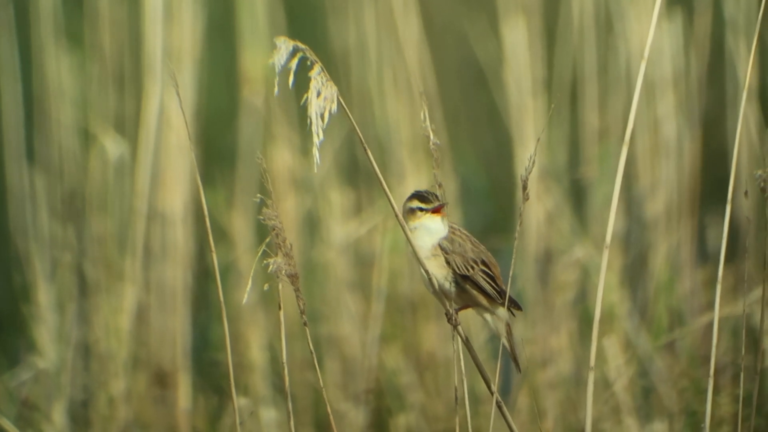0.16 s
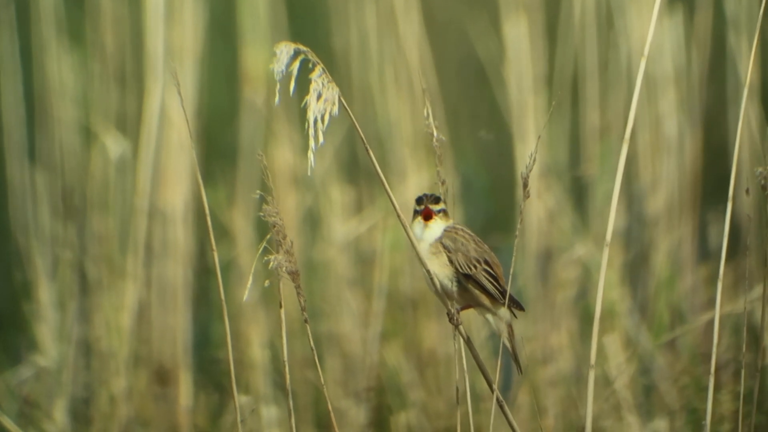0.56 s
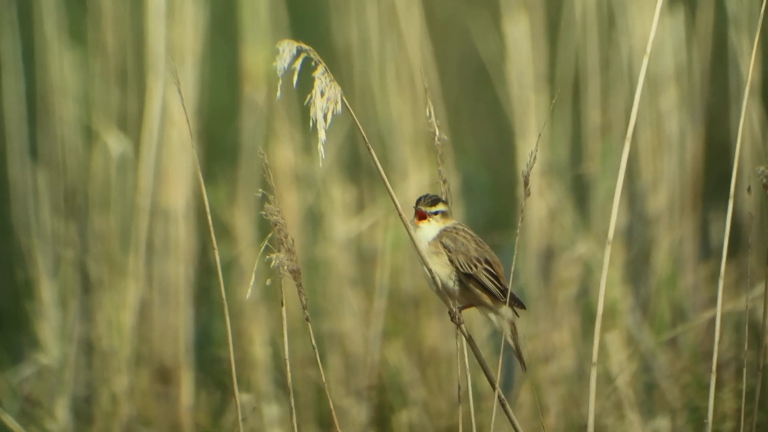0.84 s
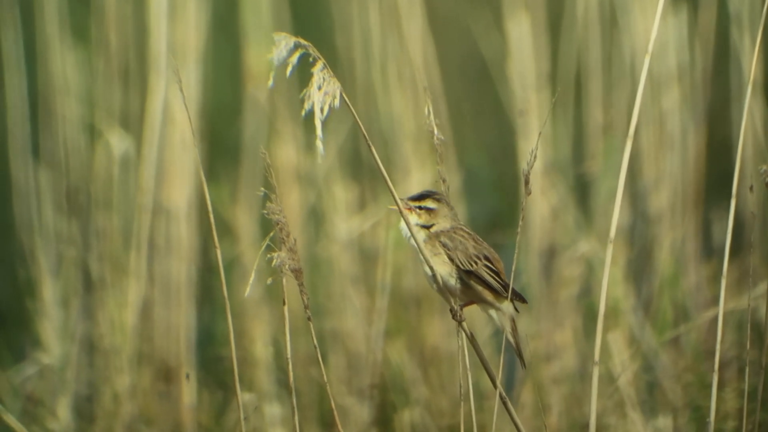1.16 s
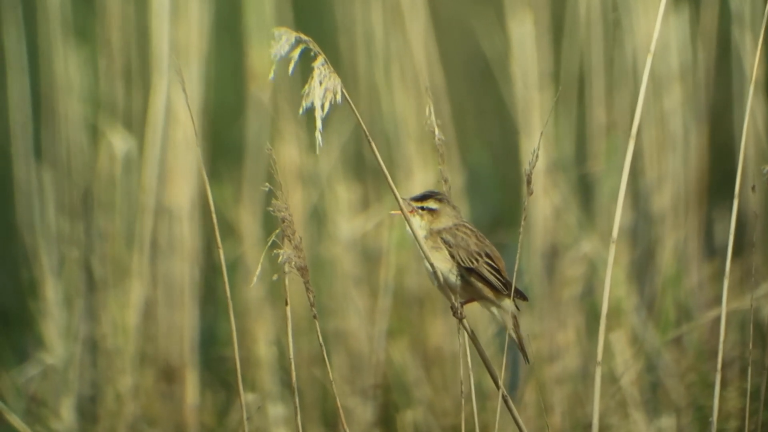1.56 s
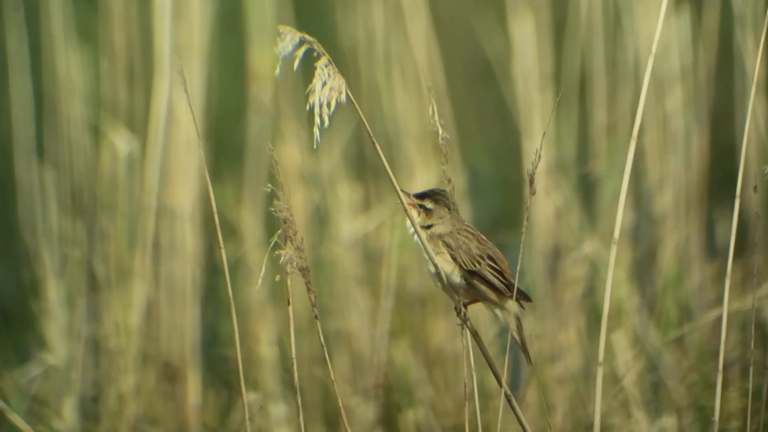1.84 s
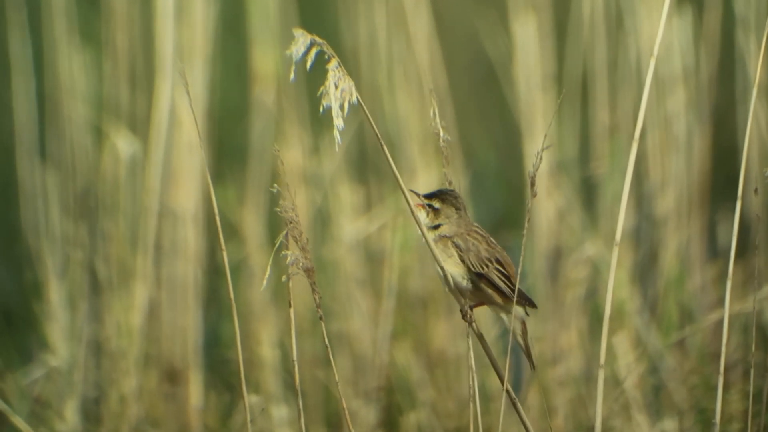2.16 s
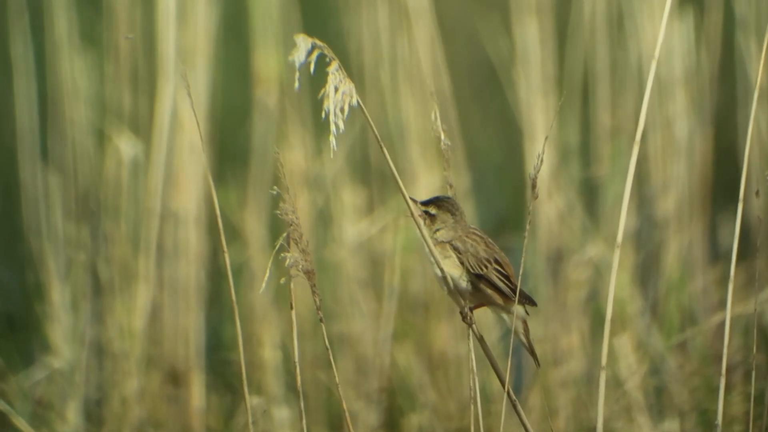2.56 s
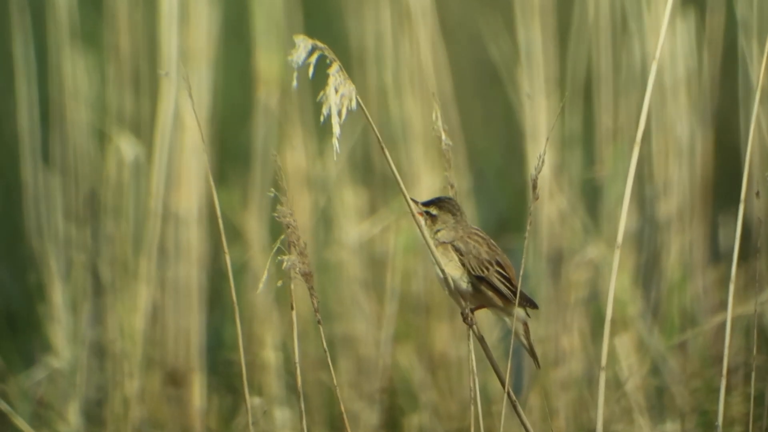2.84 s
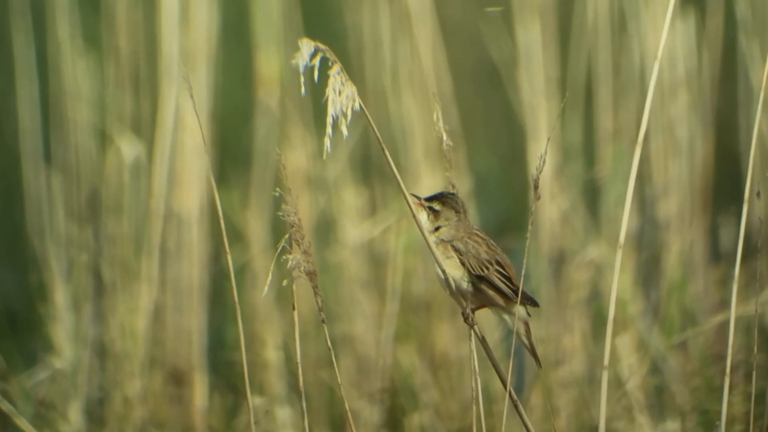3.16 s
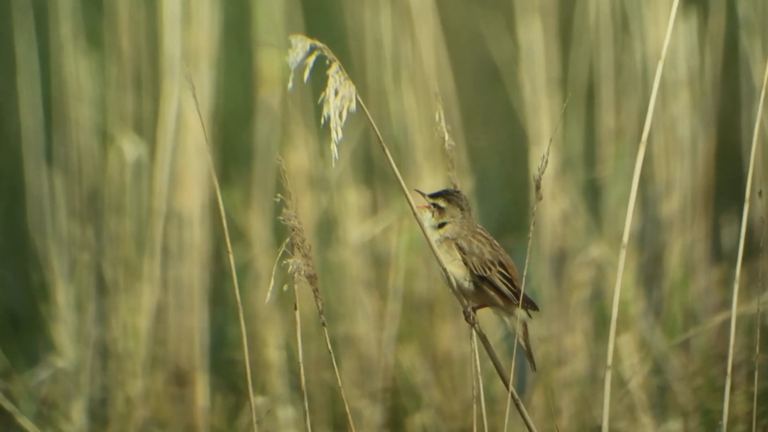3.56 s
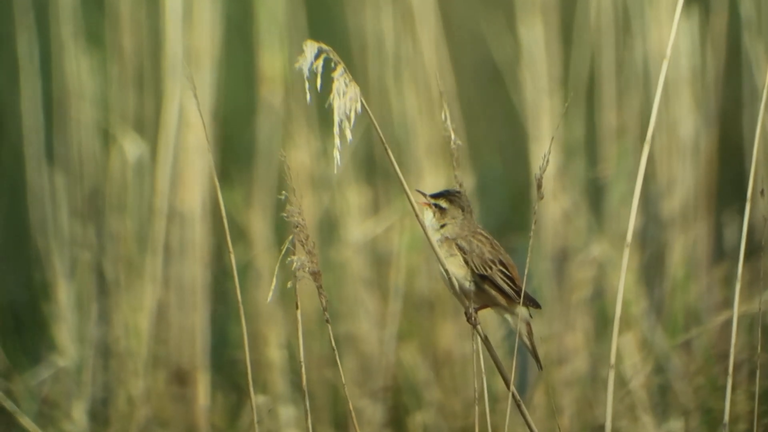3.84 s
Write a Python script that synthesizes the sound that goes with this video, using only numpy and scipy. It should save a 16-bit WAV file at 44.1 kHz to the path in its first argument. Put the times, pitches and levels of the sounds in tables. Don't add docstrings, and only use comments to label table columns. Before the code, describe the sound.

A small warbler close by chatters rapidly, alternating raspy paired chits and buzzy four-beat churrs with thin whistles; another bird churrs behind, reeds hiss faintly, and wind bumps the microphone in the second half.

```python
import sys
import numpy as np
from scipy import signal
from scipy.fft import rfft, irfft, next_fast_len
from scipy.io import wavfile
from scipy.ndimage import uniform_filter1d, map_coordinates

SR = 44100
rng = np.random.default_rng(int(sys.argv[2]) if len(sys.argv) > 2 else 0)


def generate_wav(signal):
    frames = np.transpose(np.atleast_2d(signal))
    scaled = np.clip(frames, -1, 1) * 32767
    pcm = np.round(scaled).astype(np.int16)
    wavfile.write(sys.argv[1], SR, pcm)


def amplitude_ratio(level_db):
    exponent = np.asarray(level_db, float) / 20
    return 10 ** exponent


N = 176400
T = np.arange(N) / SR


def unit(x):
    return x / np.sqrt(np.mean(x ** 2) + 1e-20)


def along(points, hz):
    f, v = np.transpose(points)
    return np.interp(np.log(hz + 1), np.log(f + 1), v)


def wobble(rate_hz):
    knots = rng.standard_normal(int(N * rate_hz / SR) + 4)
    return map_coordinates(knots, [T * rate_hz])


def tone(hz):
    return np.sin(2 * np.pi * np.cumsum(hz) / SR)


def filtered(x, response):
    m = next_fast_len(N + SR // 2)
    return irfft(rfft(x, m) * response(np.fft.rfftfreq(m, 1 / SR)), m)[..., :N]


def beats(rows):
    rows = np.array(sorted(rows))
    nearest = np.searchsorted((rows[1:, 0] + rows[:-1, 0]) / 2, T)
    u = np.clip(2 * (T - rows[nearest, 0]) / rows[nearest, 1], -1, 1)
    env = amplitude_ratio(rows[nearest, 2]) * np.cos(np.pi * u / 2) ** 2 * (abs(u) < 1)
    return env, u, rows[nearest, 3:].T


def placed(x, lead_rad, pan_db):
    ports = filtered(x, lambda f: np.exp(.5j * lead_rad(f) * np.array([[1], [-1]])))
    return amplitude_ratio([[pan_db / 2], [-pan_db / 2]]) * ports


def facing():
    # time in seconds, level in dB.
    turn_of_head = [
        (0, 0.5),
        (1.05, -6.5),
        (1.2, -18.5),
        (4, -19.5),
    ]
    return np.interp(T, *np.transpose(turn_of_head))


def air():
    # frequency in Hz, level in dB.
    air_curve = [(8000, -120), (9000, -44), (11500, -43), (13300, -31), (14200, -31), (14900, -70)]
    hiss = filtered(rng.standard_normal(N), lambda f: amplitude_ratio(along(air_curve, f)))
    return unit(hiss) * amplitude_ratio(facing())


def churr(rows):
    # multiple of the pitch, level in dB.
    partials = [(1.5, -23), (2, 0), (2.62, -12), (3, -3), (3.5, -22), (4, -21)]
    trims_db = [-0.5, -0.83, -7, 0.5, -8.2, -1.5]
    sag, waver = .06, .015
    upper_ratio, upper_sag, upper_waver = 3.05, .26, .015
    second_db, breath_db, air_db = -6, -10, -44.5
    top_facing, beat_lean = 0.35, 0.13

    env, u, (hz, upper_db, top_db) = beats(rows)
    turn = 2 * np.pi * np.cumsum(hz * (1 - sag * u / 2 + waver * wobble(300))) / SR
    stack = 0
    for (k, db), trim_db in zip(partials, trims_db):
        level_db = db + trim_db + 2 * wobble(150)
        if 2.2 < k < 3.7:
            level_db = level_db + upper_db
        if k > 3.7:
            level_db = level_db + top_db + top_facing * facing()
        stack = stack + amplitude_ratio(level_db) * np.sin(k * turn + k * k)

    second = tone(upper_ratio * hz * (1 - upper_sag * u / 2 + upper_waver * wobble(170)))
    breath_band = lambda f: np.exp(-((f - 4500) / 900) ** 2) * (f > 3800)
    breath = unit(filtered(rng.standard_normal(N), breath_band))
    upper = amplitude_ratio(upper_db) * (amplitude_ratio(second_db) * second + amplitude_ratio(breath_db) * breath)
    crest = 0.53 + 0.83 * np.exp(-(2.76 * u) ** 2) - 0.48 * np.clip(u, 0, 1)
    return env * (1 + beat_lean * u) * crest * (stack + upper + amplitude_ratio(air_db) * air())


def singer_churrs():
    # first beat in seconds, pitch in Hz.
    churr_pitches = [(.207, 1516), (.388, 1508), (1.114, 1560), (1.280, 1522), (1.953, 1559), (2.103, 1606),
                     (2.288, 1524), (3.016, 1524), (3.183, 1529), (3.356, 1548), (3.528, 1538),
                     (3.704, 1505), (3.866, 1520)]
    # centre in seconds, level in dB, upper voice in dB; four to a churr.
    churr_beats = [(0.206, -45, 2), (0.229, -43, -1.7), (0.255, -44.5, 0), (0.285, -45.0, 0.5),
                   (0.389, -49, 2), (0.41, -44.5, -1.5), (0.436, -43, -3), (0.464, -45, -1),
                   (1.115, -51.5, 5), (1.136, -47.0, 5.4), (1.162, -47, 4.5), (1.191, -45, 1),
                   (1.279, -52, 7), (1.301, -45, -2.7), (1.327, -50, 0.5), (1.355, -48, 5.5),
                   (1.953, -52.5, 6), (1.973, -46.5, 2.5), (2.0, -47.5, 5), (2.027, -48, 3.6),
                   (2.103, -49, 1), (2.124, -49, 3), (2.151, -48, -1), (2.178, -47, 4), (2.288, -52.5, 6.0),
                   (2.31, -48.5, 1.5), (2.337, -51.5, 9.5), (2.366, -45.5, 4.5), (3.018, -48.5, 12.5),
                   (3.037, -42.5, 7), (3.066, -46.5, 6.5), (3.093, -47.5, 8), (3.184, -52, 13),
                   (3.204, -46.5, 8.5), (3.23, -47.5, 5), (3.259, -49, 6.5), (3.356, -49.5, 6),
                   (3.378, -44, 5.5), (3.405, -48.5, 8), (3.435, -47, 6), (3.528, -52, 11.5),
                   (3.55, -45, 4.5), (3.576, -46.5, 5.5), (3.606, -46.5, 4), (3.704, -51, 7.5),
                   (3.726, -47, 8.5), (3.751, -46.0, 5.5), (3.781, -54.5, 8.5), (3.867, -51.5, 9),
                   (3.888, -43.5, -0.5), (3.912, -47.5, 5.5), (3.943, -49, 5.5)]
    lengths_s = [.024, .026, .027, .028]
    top_db = [11.5, -0.5, -4, 2]
    rows = []
    for i, (s, db, upper_db) in enumerate(churr_beats):
        hz = churr_pitches[i // 4][1]
        rows.append((s, lengths_s[i % 4], db, hz, upper_db, top_db[i % 4]))
    return churr(rows)


def chits():
    # first beat in seconds, gap to second in seconds, first level in dB, second level in dB.
    chit_pairs = [(0.024, .020, -45.5, -41), (0.111, 0.022, -49, -44.5), (0.585, 0.019, -50.5, -44),
                  (0.662, 0.021, -48, -42), (.747, 0.021, -46, -41.5), (0.834, 0.02, -45.5, -42),
                  (.922, 0.02, -45, -43), (1.008, 0.022, -44.5, -48), (1.487, 0.02, -46.5, -44),
                  (1.562, 0.024, -48.5, -44), (1.652, 0.017, -45.5, -45), (1.732, 0.021, -48, -47.5),
                  (1.829, 0.018, -50.5, -44), (2.47, 0.021, -45, -43), (2.558, 0.015, -44, -42.5),
                  (2.647, 0.022, -47, -42.5), (2.73, 0.019, -44, -44), (2.827, 0.021, -44, -42),
                  (2.913, 0.019, -43, -42)]
    # frequency in Hz, level in dB.
    throat = [(1800, -59), (2250, -15.5), (3350, -16.5), (3900, -19), (4700, 3), (5900, -1.5), (6800, -6),
              (7500, -45.5)]
    lengths_s, pitch_hz, jitter = [0.016, 0.022], 1135.5, 0.01733
    noise_share, flutter_hz, air_db = 0.75, 428.6, -26.5

    rows = [(s + gap_s * k, lengths_s[k], dbs[k]) for s, gap_s, *dbs in chit_pairs for k in range(2)]
    env = beats(rows)[0]
    turn = 2 * np.pi * np.cumsum(pitch_hz * (1 + .02 * wobble(8) + jitter * wobble(500))) / SR
    stack = sum(amplitude_ratio(5.8 * wobble(120)) * np.sin(k * turn + k * k) for k in range(2, 8))
    stack = stack * (1 + 0.79 * tone(flutter_hz * (1 + 0.071 * wobble(100))))
    drive = np.sqrt(1 - noise_share) * unit(stack) + np.sqrt(noise_share) * rng.standard_normal(N)
    rasp = unit(filtered(drive, lambda f: amplitude_ratio(along(list(throat) + [(9000, -120)], f))))
    rasp = rasp / np.sqrt(.5 + abs(signal.hilbert(rasp)) ** 2 / 4)
    rasp = filtered(rasp, lambda f: 1 / (1 + (f / 7500) ** 30))
    return env * (rasp + amplitude_ratio(air_db) * air())


def whistles():
    # start in seconds, length in seconds, level in dB, pitch in Hz, rise as a share of pitch.
    thin_notes = [(.058, .048, -57, 4450, .04), (1.0, .088, -55, 5520, -.012),
                  (1.105, .018, -58, 5900, .05), (1.255, .02, -61, 4700, .03), (1.44, .02, -65, 5900, .09),
                  (1.45, .026, -63, 4650, .02), (1.945, .014, -62, 5850, 0), (2.808, .016, -63, 5300, .02),
                  (2.952, .04, -53, 5250, -.015), (2.978, .036, -56, 4300, .04),
                  (3.165, .018, -54, 4400, .03), (3.51, .014, -60, 4800, .05)]
    total = 0
    for k in range(2):
        env, u, (hz, rise) = beats([(s + d / 2, d, *rest) for s, d, *rest in thin_notes[k::2]])
        swell = (1 + 2 * u * u - u / 2) * amplitude_ratio(1 + 2 * wobble(150))
        total = total + env * swell * tone(hz * (1 + rise * u + .008 * wobble(100)))
    return total


def neighbour_churrs():
    # first beat in seconds, level in dB, pitch in Hz.
    far_churrs = [(.091, -52.5, 1560), (0.302, -68, 1560), (0.483, -68, 1560), (0.674, -64.5, 1560),
                  (0.864, -67.5, 1560), (1.033, -72.5, 1550), (1.219, -76, 1550), (1.423, -68.5, 1550),
                  (1.658, -66, 1570), (1.85, -63, 1570), (2.021, -59.5, 1560), (2.195, -58, 1580),
                  (2.37, -58, 1560), (2.55, -55, 1560), (2.854, -49, 1560), (2.999, -50, 1550),
                  (3.196, -49, 1560), (3.385, -50, 1550), (3.561, -50, 1550), (3.737, -50, 1550),
                  (3.906, -50.5, 1570)]
    offsets_s, length_s = [0, .022, 0.04155], 0.0321
    return churr([(s + b, length_s, db - 12 * (b == 0), hz, 1.5, -5)
                  for s, db, hz in far_churrs for b in offsets_s])


def echoes(x, t60_s):
    t = np.arange(SR // 2) / SR
    tail = rng.standard_normal((2, len(t))) * amplitude_ratio(-60 * t / t60_s) * (t > .002)
    return signal.fftconvolve(x[None], tail / np.linalg.norm(tail[0]), axes=1)[:, :N]


def birds():
    # frequency in Hz, phase lead between ports in radians.
    port_lead = [(2400, -.4), (4050, -.1), (4570, -1.2), (5200, -.6), (5600, .6), (6120, -1.2), (6400, -6),
                 (9000, -7.3)]
    song = singer_churrs() + chits() + whistles()
    far = neighbour_churrs()
    direct = placed(song, lambda f: along(port_lead, f), -1.5)
    direct = direct + placed(far, lambda f: along(port_lead, f) + 0.17, -8)
    echo = amplitude_ratio(-18.5) * echoes(song + far, t60_s=0.11)
    scatter = amplitude_ratio(-7) * echoes(song + far, t60_s=0.078)
    return direct + echo + scatter


def thumps():
    # time in seconds, level in dB, frequency in Hz, width in cycles.
    eddies = [(0.087, -54.5, 110, 0.5), (2.085, -38.5, 68.7, 0.32), (2.151, -49.5, 90, 0.61),
              (2.255, -28, 105.2, 0.59), (2.28, -47, 99, 1), (2.348, -43, 109, 0.9),
              (2.39, -40.5, 141.6, 0.7), (2.414, -30.5, 150, 0.42), (2.457, -22, 133.7, 0.45),
              (2.482, -27.5, 126, 1), (2.859, -46, 70, 0.48), (2.559, -46, 88, 0.16),
              (2.64, -37, 96.6, 0.86), (2.654, -32.5, 186, 0.25), (2.674, -37, 129, 0.54),
              (2.716, -38.5, 90.5, 0.44), (2.751, -30, 187, 0.49), (2.794, -46, 110, 0.7),
              (2.92, -51, 99, 0.85), (2.944, -31, 131, 0.37), (3.019, -42.5, 109.5, 0.31),
              (3.322, -42.5, 90, .5), (3.602, -27.5, 126, 0.94), (3.658, -32, 128.6, 0.37),
              (3.781, -51.5, 147, 0.83), (3.904, -32, 126, 0.46), (3.946, -33, 189.5, 0.47),
              (3.99, -43.5, 100.8, 0.66)]
    lead_rad, pan_db, wake_db, wake_s = -1.4, 2.1, -18.5, 0.03
    push, wake = np.zeros(N), np.zeros(N)
    for s, db, hz, wide in eddies:
        cycles = (T - s) * hz
        push += 1.91 * amplitude_ratio(db) * np.exp(-(cycles / wide) ** 2) * np.cos(2 * np.pi * cycles + .4)
        wake += amplitude_ratio(db) * np.exp(-abs(T - s) / wake_s)
    rumble_band = lambda f: (f / 110) ** 2 / (1 + (f / 140) ** 5)
    rumble = unit(filtered(rng.standard_normal((2, N)), rumble_band))
    push = filtered(push, lambda f: (f * f / (f * f + 40 ** 2)) ** 2)
    push = placed(push, lambda f: lead_rad * np.clip(f / 125, 0, 1.5), pan_db)
    return push + amplitude_ratio(wake_db + 5.44 * wobble(30)) * wake * rumble


def insect():
    # time in seconds, level in dB.
    tick_times = [(0.0217, -72), (0.0847, -80), (0.6434, -72), (0.7253, -74), (1.045, -74), (1.0879, -79),
                  (1.1653, -75), (1.2835, -72), (1.3209, -82), (1.3658, -80), (1.4411, -76), (1.8871, -72),
                  (1.924, -64), (2.0009, -73), (2.1231, -80), (2.2403, -81), (2.5506, -79), (2.604, -66),
                  (2.824, -77), (3.7275, -66.5), (3.8846, -72)]
    tick_hz, tick_s, tick_db = 7950, 0.018, 5
    env = beats([(s + tick_s / 3, tick_s, db + tick_db, 0) for s, db in tick_times])[0]
    return placed(env * tone(tick_hz * (1 + .012 * wobble(180))), lambda f: 2 + 0 * f, -3.5)


def reeds():
    # frequency in Hz, level in dB.
    reed_curve = [(15, -71), (35, -19.5), (150, -10), (500, -14), (1560, -21.5), (5500, -29.5),
                  (8100, -37.5), (8400, -44.5)]
    # frequency in Hz, likeness of the two sides from -1 to 1.
    likeness = [(60, 0.8), (120, .93), (240, 0.47), (500, 0.49), (1500, -0.46)]
    z = signal.stft(rng.standard_normal((2, N)), nperseg=512)[2]
    patches = uniform_filter1d(rng.standard_normal(z.shape[1:]), size=4, axis=0)
    patches = unit(uniform_filter1d(patches, size=14, axis=1))
    depth_db = np.linspace(1.5, 9, len(patches))[:, None]
    pair = signal.istft(z * amplitude_ratio(depth_db * patches), nperseg=512)[1][:, :N]

    def mid_side(hz):
        turn = np.arccos(np.clip(along(likeness, hz), -1, 1)) / 2
        level = amplitude_ratio(along(list(reed_curve) + [(15000, -64.5), (16000, -120)], hz))
        return level * [np.cos(turn), np.sin(turn)]

    mid, side = filtered(pair, mid_side)
    sway_db = .7 * wobble(2)
    return amplitude_ratio(-64.5 + sway_db) * amplitude_ratio([[-.6], [.6]]) * [mid + side, mid - side] / mid.std()


def masked(x):
    split_hz, top_hz, under_song_db = 6400, 8600, -37
    hz, _, z = signal.stft(x, SR, nperseg=1024)
    power = uniform_filter1d(abs(z) ** 2, size=16, axis=1)
    power = uniform_filter1d(power, size=3, axis=2).mean(0)
    song = power[(hz > 2500) & (hz < split_hz)].max(0)
    limit = song * amplitude_ratio(2 * under_song_db + 5 * rng.standard_normal(len(song)))
    treble = (hz[:, None] > split_hz) & (hz[:, None] < top_hz)
    return signal.istft(z * ~(treble & (power < limit)), SR, nperseg=1024)[1][:, :N]


def scene():
    return birds() + thumps() + reeds() + insect()


def band_limit(x):
    return signal.sosfilt(signal.butter(12, 14800, fs=SR, output="sos"), x)


def record(dry):
    mix = masked(dry)
    return band_limit(mix)


dry = scene()
out = record(dry)
generate_wav(out)
```